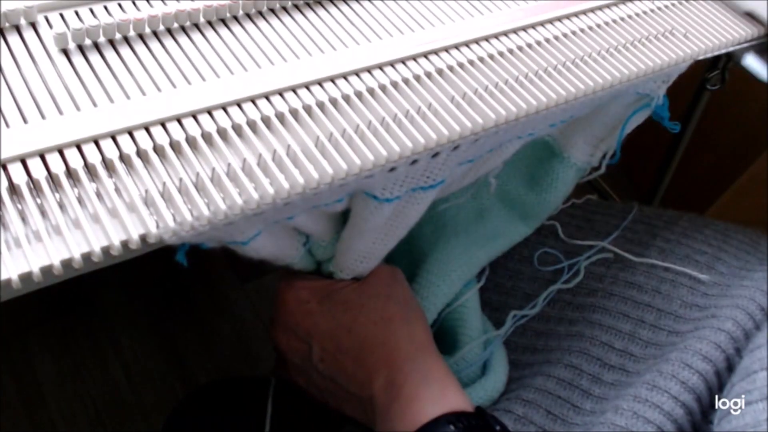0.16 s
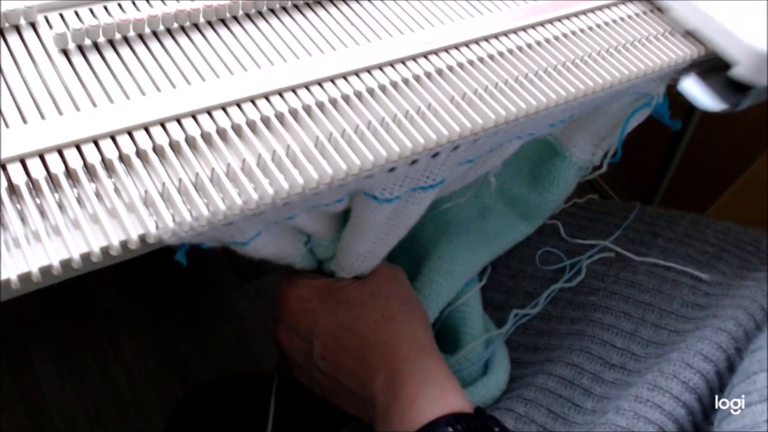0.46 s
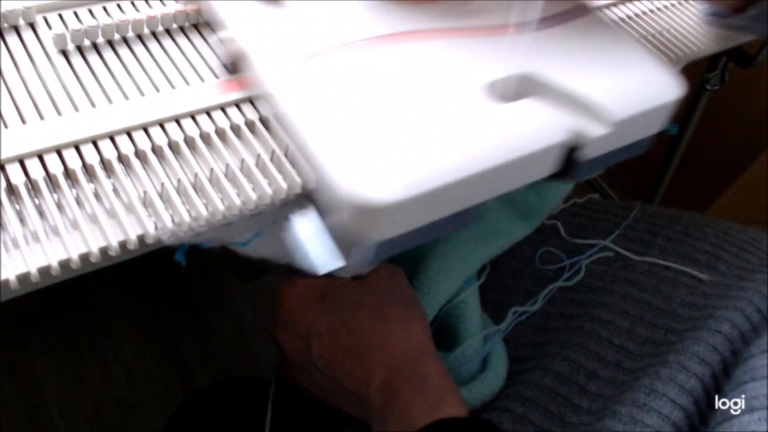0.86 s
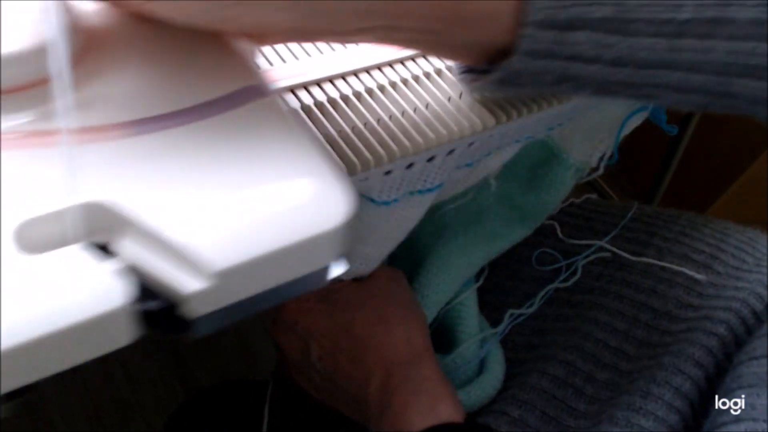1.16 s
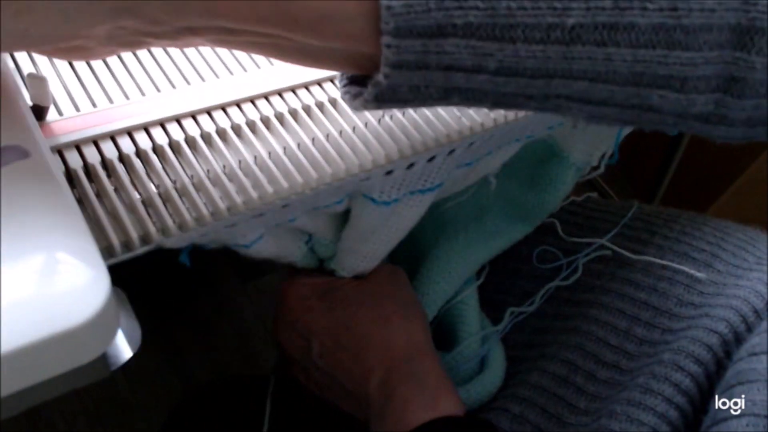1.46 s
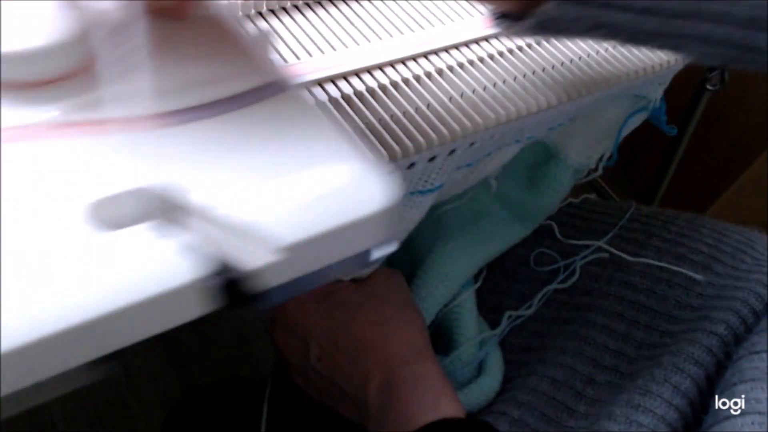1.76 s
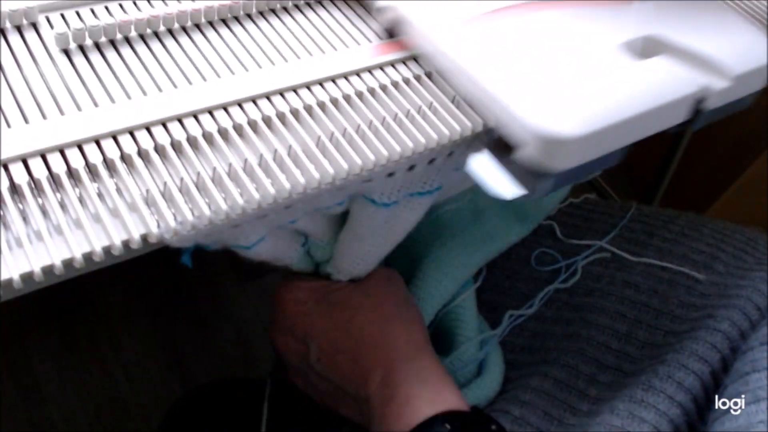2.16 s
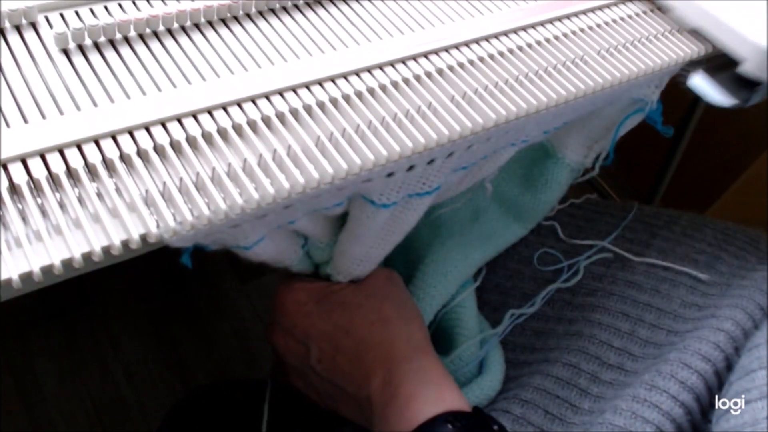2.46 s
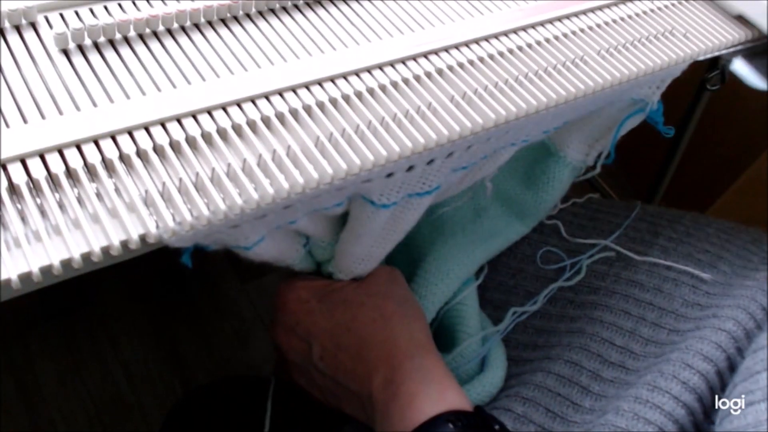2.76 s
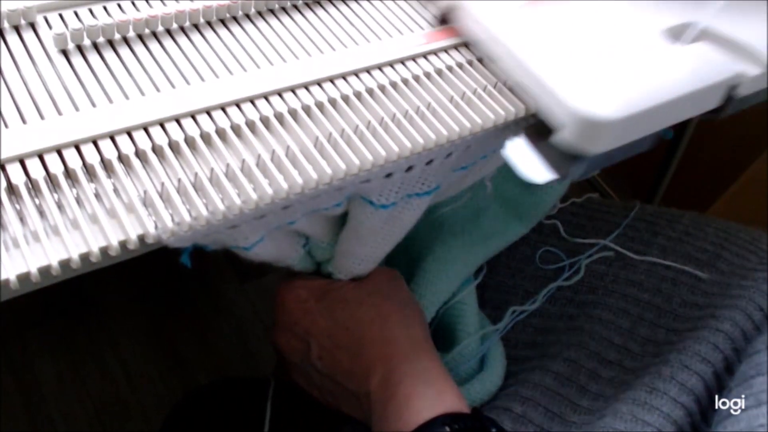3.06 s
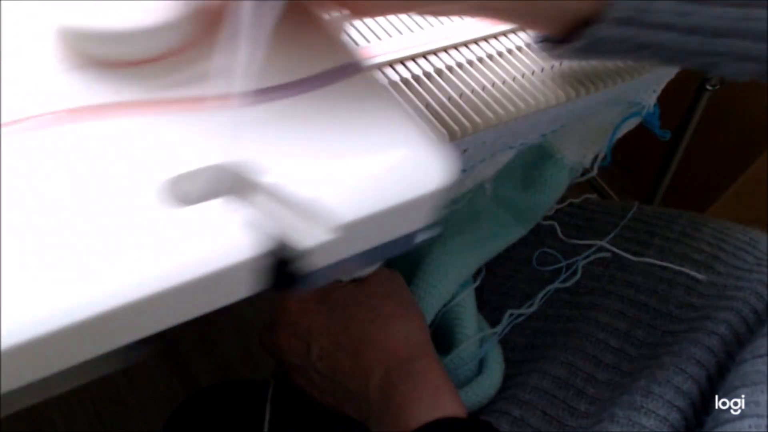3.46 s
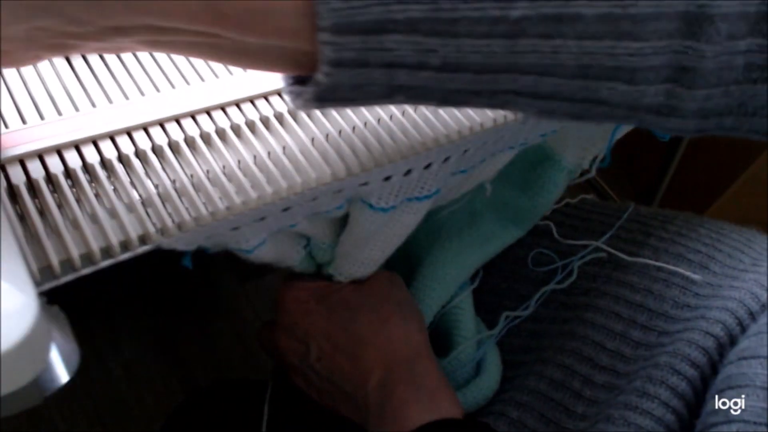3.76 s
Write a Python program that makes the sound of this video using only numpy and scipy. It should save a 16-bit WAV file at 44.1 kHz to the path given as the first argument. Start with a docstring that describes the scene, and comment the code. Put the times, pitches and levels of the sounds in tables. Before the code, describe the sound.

Knitting carriage runs: dense needle ticking with hollow plastic rumble and low swelling drones, three passes separated by clacks and faint scrapes. Close stereo webcam sound, crackling and fizzy at peaks, in a small quiet room.

```python
"""A brief scrap of rattle, then three harsh runs of a plastic knitting carriage along its steel needle bed.
Needle impacts, as noise ticks whose rate follows the level, excite steel, shell, bed and table; sine tones swell.
Cams clack around each turn as decaying bursts through resonances; rattles settle after runs, and faint scrapes
lie outside them, before each and once after the last. A small room answers with decaying noise over a steady hush.
At two close webcam microphones, loud runs overflow the converter: peaks wrap in sign, with a treble fizz."""
import sys
import numpy as np
from scipy import signal
from scipy.fft import rfft, irfft, next_fast_len
from scipy.io import wavfile
from scipy.ndimage import uniform_filter1d, map_coordinates

SR = 44100
rng = np.random.default_rng(int(sys.argv[2]) if len(sys.argv) > 2 else 0)


def write(x):
    x = np.atleast_2d(x).T
    wavfile.write(sys.argv[1], SR, np.round(np.clip(x, -1, 1) * 32767).astype(np.int16))


N = 171990  # samples


def amp(db):
    """Decibel law: amplitude ratio of a level in dB."""
    return 10 ** (np.asarray(db) / 20)


def unit(x):
    """Normalisation: the signal scaled to an rms of one."""
    return x / np.sqrt(np.mean(x ** 2) + 1e-20)


def along(points, hz):
    """Logarithmic pitch scale: (frequency, value) points joined by lines over log frequency."""
    point_hz, value = np.transpose(points)
    return np.interp(np.log(hz + 1), np.log(point_hz + 1), value)


def joined(tables):
    """Envelope interpolation: columns per sample; the first column, a level, is silent between tables."""
    rows = []
    for table in tables:
        rows.append((table[0][0] - .004, -120, *table[0][2:]))
        rows += table
        rows.append((table[-1][0] + .004, -120, *table[-1][2:]))
    time_s, *columns = np.transpose(rows)
    t = np.arange(N) / SR
    return [np.interp(t, time_s, column) for column in columns]


def filtered(x, response):
    """Linear filtering: the spectrum times a complex frequency response."""
    size = next_fast_len(N + SR // 2)  # padded so that ringing does not wrap round
    hz = np.fft.rfftfreq(size, 1 / SR)
    return irfft(rfft(x, size) * response(hz), size)[..., :N]


def modes(table):
    """Modal superposition: causal response of damped resonances with alternating signs."""
    def response(f):
        total = 0
        for k, (centre, width, db) in enumerate(table):
            damping = 1j * f * width
            total = total + (-1) ** k * amp(db) * damping / (centre ** 2 - f ** 2 + damping)
        return total
    return response


def colour(points):
    """Spectral envelope: a zero-phase gain through (frequency, dB) points."""
    return lambda hz: amp(along(points, hz))


# Correlation of the two microphones; columns: frequency_hz, correlation (no unit)
LIKENESS = [(30, 0), (90, .15), (180, .55), (350, .3), (700, .55), (1500, .1), (3000, .15), (6000, 0)]


def pair():
    """Spatial coherence: white noise at two microphones, correlated by frequency."""
    def mid_side_gains(hz):
        turn = np.arccos(np.clip(along(LIKENESS, hz), -1, 1)) / 2
        return np.array([np.cos(turn), np.sin(turn)])
    mid, side = filtered(rng.standard_normal((2, N)), mid_side_gains)
    return np.array([mid + side, mid - side])


def dying(blows, t60, rise):
    """Exponential damping: each blow rises over a short time (s), then loses 60 dB in t60 (s)."""
    size = max(int(rise * SR), 1)
    return signal.lfilter(np.ones(size) / size, [1, -amp(-60 / (t60 * SR))], blows)


# Spectrum of the steady background; columns: frequency_hz, level_db
HUSH_SPECTRUM = [(24, -9), (50, 7), (130, -1.5), (200, -10.5), (340, 0), (480, -2), (700, -9), (4900, -28),
                 (15600, -32)]
HUSH_DB = -54.5  # rms


def hush():
    """Stationary noise: a steady, mostly low background at a fixed level."""
    return amp(HUSH_DB) * unit(filtered(pair(), colour(HUSH_SPECTRUM)))


# Level of each run; columns: time_s, rattle_level_db, shell_over_rattle_db, bed_over_rattle_db,
# table_over_rattle_db
RUNS = [
    [(0.0, -29.5, -22, 9, 3), (0.018, -38.5, 19.5, -0.5, -1.5), (0.04, -31, -45, 6, -1.5)],
    [(0.432, -22, -11.5, -6, -14), (0.466, -22, -3.5, -4.5, -15.5), (0.582, -14, -2.5, -2.5, -2),
     (0.752, -15.5, 0, -2, -20), (0.812, -16, 0.5, -3, -4), (0.942, -16.5, 0.5, -2.5, -8.5),
     (0.978, -13.5, -3.5, -3.5, -3), (1.028, -18, 4, -2.5, -16), (1.096, -21, -1, -11, -34),
     (1.172, -27.5, 10.5, -1.5, -3.5), (1.192, -22.5, -5, -4, -15), (1.208, -33, 0, 4, -6),
     (1.234, -27, 2.5, -7, -5), (1.31, -44, -0.5, 3, -27)],
    [(1.6, -27, 3.5, -28, -30), (1.642, -29.5, 3.5, -9, -43.5), (1.738, -19, 2, -2.5, -25),
     (1.794, -14, 1.5, -0.5, -8), (1.93, -17.5, -0.5, -3, -16.5), (1.986, -14.5, -3.5, -0.5, -12),
     (2.046, -17, 2, 1.5, -27), (2.108, -16, 0, -5, -14.5), (2.236, -15, -4, -8, -23.5),
     (2.27, -20.5, -2.5, -16, -11.5), (2.298, -22.5, 1.5, 3, -19.5), (2.346, -27, 1, -8, -2.5),
     (2.364, -25, -10, -2, -1), (2.42, -36.5, 4, 2, -14)],
    [(2.82, -23, -2.5, -12, -30), (2.836, -23.5, -6.5, -7.5, -21), (2.948, -16.5, -3.5, -7, -10),
     (2.978, -13.5, -3, -2, -12), (3.022, -14.5, -0.5, -3.5, -5), (3.08, -16, 0, -0.5, -14.5),
     (3.254, -15, 3, 3.5, -8), (3.366, -14, -1.5, -1, -12.5), (3.442, -18, 6.5, -6, -16.5),
     (3.474, -21.5, 0.5, 1, -11), (3.518, -23.5, 3.5, 0, -13), (3.548, -32.5, 1, -2, -6),
     (3.552, -25, 3, -0.5, -23), (3.61, -39.5, -5.5, -0.5, -1.5)],
]
# Spectrum of the needle rattle; columns: frequency_hz, level_db (per Hz)
RATTLE_SPECTRUM = [(600, -43), (1000, -13.5), (1250, -7), (1530, 0), (2200, 0.5), (2720, -2.5), (3300, -2),
                   (5290, -4), (6200, -3), (7300, -8.5), (9000, -16.5), (11000, -15.5), (15600, -31.5)]
# Resonances of the carriage shell; columns: frequency_hz, width_hz, level_db
SHELL_MODES = [(575.6, 60, -6.5), (671.2, 35, -0.5), (740, 27, 0), (808, 50, -3), (907.4, 55, -2.5),
               (998.5, 130, -6), (1152.6, 74, -3), (1256.5, 92, -5.5)]
# Resonances of the needle bed; columns: frequency_hz, width_hz, level_db
BED_MODES = [(130.9, 20, 0), (180.6, 23.7, 1), (238.2, 42, -0.5), (282, 37, -1.5), (338.4, 35, 0),
             (414.6, 60, -2.5), (505.3, 60, -2.5)]
# Spectrum of the table; columns: frequency_hz, level_db (per Hz)
TABLE_SPECTRUM = [(15, -45), (25, -8.5), (50, -7), (88, -2), (110, -8), (200, -32.5)]
NEEDLES_PER_S, REFERENCE_DB = 260, -15.5  # tick rate when the rattle is at this level
RATE_GROWS = .7  # dB of tick rate per dB of rattle
SIZE_DB, TICK_S = 3, 0.017  # mean of the random size excess; t60 of a tick
SLIDE_DB = -4.5  # sliding hiss relative to the ticks
SLOW_DB = -28.5  # rattle level at which an added hiss equals the ticks; it grows below


def carriage():
    """Forced vibration: needle impacts over a sliding hiss excite steel, shell, bed and table."""
    level_db, shell_db, bed_db, table_db = joined(RUNS)
    rate = NEEDLES_PER_S * amp(RATE_GROWS * (level_db - REFERENCE_DB))
    needles_passed = np.cumsum(rate / SR)
    luck = rng.random((2000, 2))  # timing and size of each needle
    at = np.searchsorted(needles_passed, np.arange(2000) + .8 * luck[:, 0])
    sizes = amp(-SIZE_DB * np.log(luck[:, 1] + 0.00076))
    blows = np.bincount(at, sizes, N + 1)[:N]
    ticks = dying(blows, TICK_S, rise=.0005)
    # even out the ticks to a local rms near one
    ticks /= np.sqrt(np.abs(uniform_filter1d(ticks ** 2, SR // 16))) + 1e-3
    slide = amp(SLIDE_DB) + amp(np.minimum(SLOW_DB - level_db, 20))
    shake = (ticks + slide) / (1 + slide)
    parts = [(colour(RATTLE_SPECTRUM), 0), (modes(SHELL_MODES), shell_db),
             (modes(BED_MODES), bed_db), (colour(TABLE_SPECTRUM), table_db)]
    out = 0
    for response, over_db in parts:
        force = shake * pair()
        reference = np.std(filtered(force, response))
        out = out + filtered(force * amp(level_db + over_db), response) / reference
    return out


# Swelling tones of bed and shell during and around the runs; columns: start_s, length_s, pitch_hz, level_db
SWELLING_TONES = [(0.863, 0.26, 172, -16.5), (1.11, 0.16, 131, -23), (1.307, 0.2, 131, -41),
                  (1.845, 0.25, 276, -16.5), (2.174, .15, 173.7, -20), (2.407, 0.22, 135, -39.5),
                  (3.547, 0.18, 133.5, -33), (0, 0.25, 131.5, -43), (1.126, .13, 730, -28),
                  (2.24, 0.16, 705, -22), (2.63, .08, 450, -42.5), (2.66, .05, 526, -47),
                  (3.74, .14, 1216, -69.5), (2.69, .07, 1100, -49), (1.62, 0.11, 1150, -32),
                  (3.386, 0.2, 1150, -30.5), (3.8, 0.13, 131, -56)]


def drones():
    """Tonal radiation: swelling sine tones whose phase and level wander."""
    t, out = np.arange(N) / SR, 0
    for start, length, hz, db in SWELLING_TONES:
        swell = np.sin(np.pi * np.clip((t - start) / length, 0, 1)) ** .8
        wander = map_coordinates(rng.standard_normal(200), [t * 30])  # 30 random points per second
        phase = 0.72 * wander + [[0], [.6]]  # radians; the second microphone leads
        out = out + amp(db + 2 * wander) * swell * np.sin(2 * np.pi * hz * t + phase)
    return out


# Reverberation of the small room; columns: frequency_hz, t60_s
ROOM_DECAY = [(150, 0.36), (600, 0.3), (2000, .3), (8000, 0.074)]
ROOM_DB = -6.5  # relative to the direct sound


def room(x):
    """Diffuse reverberation: convolution with noise whose decay time depends on frequency."""
    hz, t, z = signal.stft(rng.standard_normal((2, SR // 2)), SR, nperseg=256)
    decay = amp(-60 * t / along(ROOM_DECAY, hz)[:, None])
    tail = signal.istft(z * decay, SR, nperseg=256)[1]
    tail = tail / np.linalg.norm(tail[0])
    delayed = np.pad(x, ((0, 0), (300, 0)))  # samples before the room answers
    return amp(ROOM_DB) * signal.fftconvolve(delayed, tail, axes=1)[:, :N]


# Single clacks of cams and needles; columns: start_s, steel_peak_db, plastic_over_steel_db
CAM_CLACKS = [(0.0454, -9, 4), (0.2728, -34, -13), (0.317, -33, -9), (0.4226, -4, -2.5),
              (1.0854, -20.5, 14), (1.1134, -35, 8.5), (1.1453, -24, 5), (1.1654, -46.5, 35.5),
              (1.1857, -46, 4), (1.2343, -21, 1), (1.2656, -33, 3), (1.3187, -17.5, 4),
              (1.3244, -18.5, 7.5), (1.3306, -33, -13.5), (1.3404, -34, 8.5), (1.3728, -22.5, -19.5),
              (1.3884, -40.5, -9), (1.496, -38, -9), (1.5247, -30.5, 1), (1.558, -17.5, -25),
              (1.5776, -21, -3), (1.587, -17, 3.5), (1.6207, -23, 12), (1.6747, -41, 20), (1.711, -8, 3),
              (2.3411, -19, -9), (2.4328, -10.5, 4), (2.6803, -36, -7), (2.7133, -31, 0),
              (2.7588, -30, -11), (2.784, -33, -18), (2.789, -26, -15.5), (2.811, -4.5, -4),
              (3.5175, -18.5, 8.5), (3.5548, -46, -7), (3.6137, -16.5, 9), (3.6209, -15.5, 6.5),
              (3.626, -34.5, -2.5), (3.6414, -47, 12), (3.6765, -24, -7), (3.6994, -41, -15),
              (3.8431, -36, -46)]
# Resonances of the steel; columns: frequency_hz, width_hz, level_db
STEEL_MODES = [(2250, 570, -2), (2500, 900, 5.5), (3140, 730, 9), (4320, 500, 3), (4926, 790, 4),
               (6540, 580, 1), (7340, 1700, -3.5)]
# Resonances of the knocked plastic; columns: frequency_hz, width_hz, level_db
PLASTIC_MODES = [(675, 63, -0.5), (1106, 315, -1), (1525, 480, 2), (1927, 750, -0.5), (2484, 315, -4)]
STEEL_S, PLASTIC_S, THUD_S, RISE_S = 0.035, 0.041, 0.047, .0025  # t60 of each part; rise of all
THUD_DB, CREST_DB = -14, 4  # bed relative to plastic; peak over rms


def clacks():
    """Impact excitation: decaying noise bursts ring steel, plastic and, as a thud, the bed."""
    start_s, steel_db, over_db = np.transpose(CAM_CLACKS)
    at = np.round(start_s * SR).astype(int)
    plastic_db = steel_db + over_db
    parts = [(steel_db, STEEL_S, STEEL_MODES), (plastic_db, PLASTIC_S, PLASTIC_MODES),
             (plastic_db + THUD_DB, THUD_S, BED_MODES)]
    out = 0
    for db, t60, table in parts:
        noise = pair()
        burst = noise * dying(np.bincount(at, amp(db - CREST_DB), N), t60, RISE_S)
        out = out + filtered(burst, modes(table)) / np.std(filtered(noise, modes(table)))
    return out


# Loose parts settling after a stop, one table a stop; columns: time_s, level_db
SETTLING_LEVELS = [
    [(0.06, -40), (0.078, -35.5), (0.192, -44), (0.2, -45)],
    [(1.345, -30), (1.351, -42), (1.401, -43), (1.46, -68)],
    [(2.445, -25), (2.461, -28.5), (2.571, -42), (2.6, -60)],
    [(3.645, -26), (3.655, -37), (3.699, -40), (3.76, -83)],
]
# Spectrum of the settling parts; columns: frequency_hz, level_db
SETTLING_SPECTRUM = [(180, -34), (300, 8), (1120, -5), (1350, -20.5), (1700, -14), (4080, -10), (5140, -6),
                     (8310, -15.5), (15600, -18.5)]


def settling():
    """Amplitude-modulated noise: a fading rattle of loose parts after each stop."""
    return amp(joined(SETTLING_LEVELS)[0]) * unit(filtered(pair(), colour(SETTLING_SPECTRUM)))


# Carriage creeping outside the runs, one table a scrape; columns: time_s, level_db
CREEP_LEVELS = [
    [(0.26, -61), (0.276, -46), (0.302, -48), (0.336, -39), (0.415, -37)],
    [(1.49, -67), (1.532, -44), (1.55, -62), (1.556, -42), (1.585, -37.5)],
    [(2.64, -52), (2.674, -60), (2.682, -47), (2.756, -47), (2.805, -28.5)],
    [(3.82, -76), (3.836, -72), (3.846, -51.5), (3.86, -64), (3.9, -71)],
]
# Spectrum of the creeping scrape; columns: frequency_hz, level_db
CREEP_SPECTRUM = [(88, -52), (150, -22), (540, -28), (709, -8), (845, -20), (1110, 1), (1270, -26),
                  (1600, 1.5), (2190, -6), (3230, -1.5), (15600, -21.5)]


def creep():
    """Friction noise: faint scrapes outside the runs, before each and once after the last, as shaped noise."""
    return amp(joined(CREEP_LEVELS)[0]) * unit(filtered(pair(), colour(CREEP_SPECTRUM)))


def scene():
    """Superposition: machine noises with their reverberation, swelling tones and the hush."""
    machine = carriage() + clacks() + settling() + creep()
    return hush() + machine + drones() + room(machine)


FULL_SCALE, FLIP = .87, .62  # overflow amplitude; share of the full wrap that is added
KNEE_HZ, KNEE_DB = 7700, -7  # treble step before the overflow
FIZZ_HZ, FIZZ_DB, FIZZ_S = 7400, -9, .028  # lower edge; noise before it, relative to overflow; smoothing
LEFT_DB, TOP_HZ = -1.1, 15714  # left relative to right; band limit


def record(dry):
    """Overflow distortion: peaks wrap towards the opposite sign and add fizz, before a sharp band limit."""
    dry = filtered(dry, lambda hz: amp(KNEE_DB / (1 + (KNEE_HZ / (hz + 1)) ** 30)))
    wrapped = (dry + FULL_SCALE) % (2 * FULL_SCALE) - FULL_SCALE
    flips = wrapped - dry
    size = int(FIZZ_S * SR)
    power = uniform_filter1d(uniform_filter1d(flips ** 2, size), size)
    spread = np.sqrt(np.abs(power))
    fizz = filtered(spread * rng.standard_normal(dry.shape), lambda hz: 1 / (1 + (FIZZ_HZ / (hz + 1)) ** 6))
    balance = amp([[LEFT_DB / 2], [-LEFT_DB / 2]])
    out = (dry + FLIP * flips + amp(FIZZ_DB) * fizz) * balance
    return filtered(out, lambda hz: hz < TOP_HZ)


dry = scene()
out = record(dry)
write(out)
```